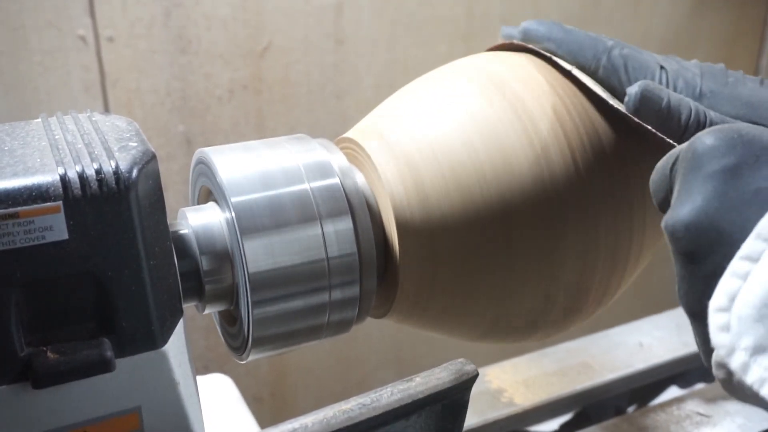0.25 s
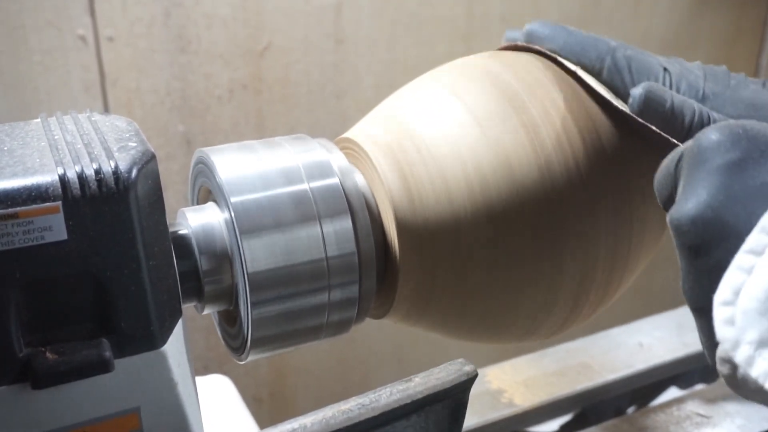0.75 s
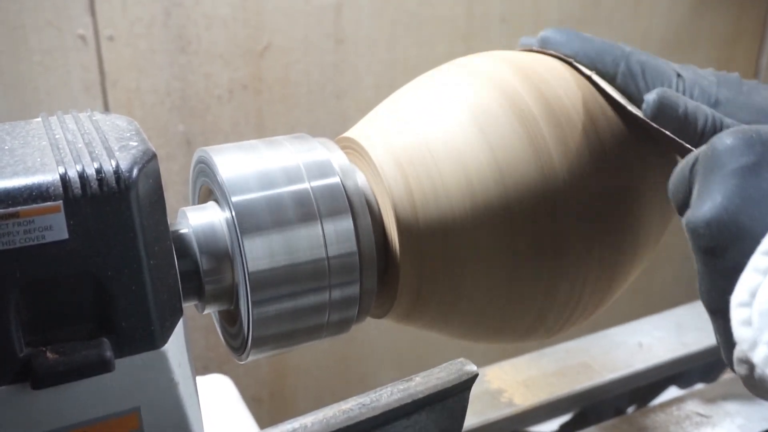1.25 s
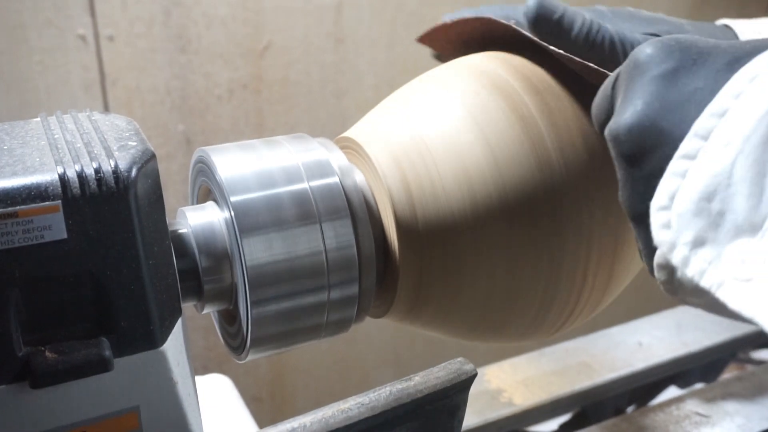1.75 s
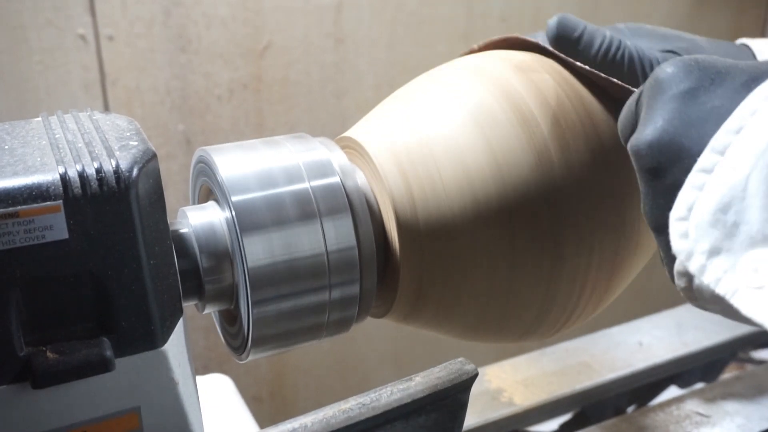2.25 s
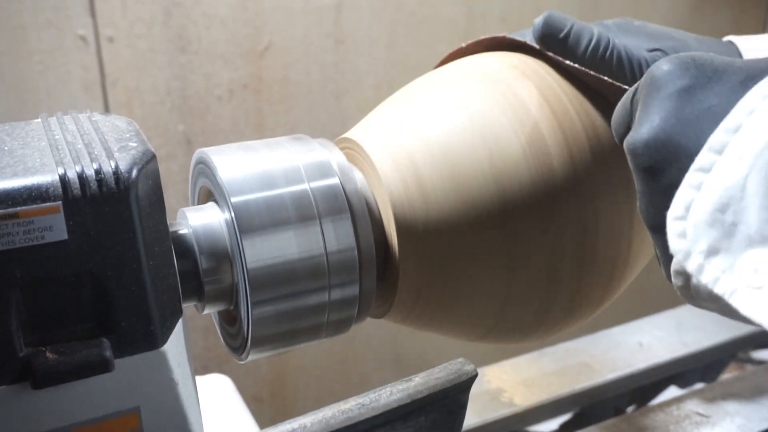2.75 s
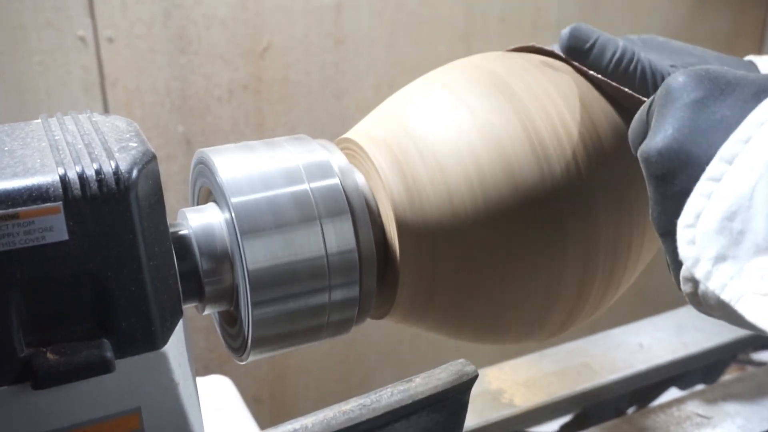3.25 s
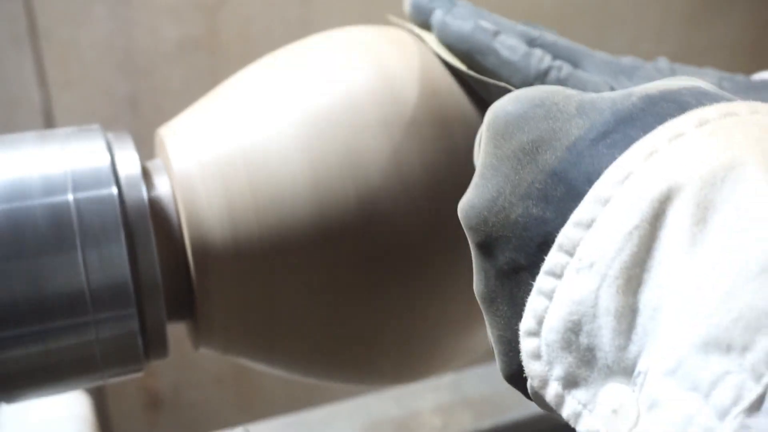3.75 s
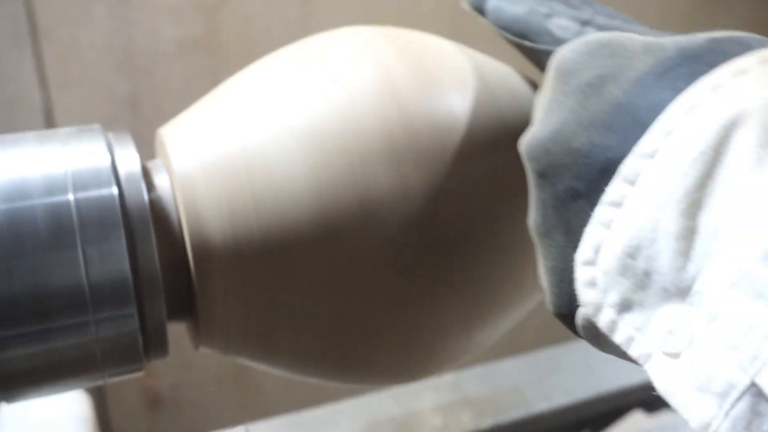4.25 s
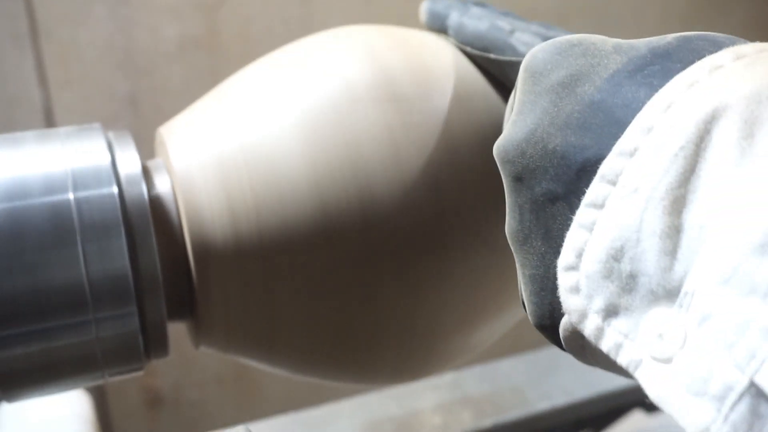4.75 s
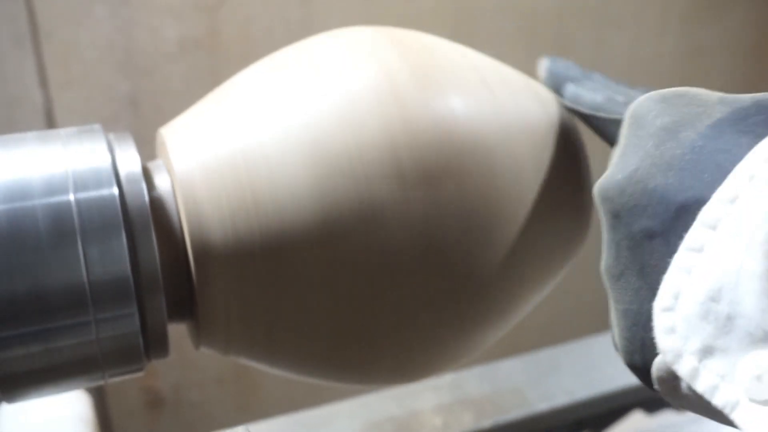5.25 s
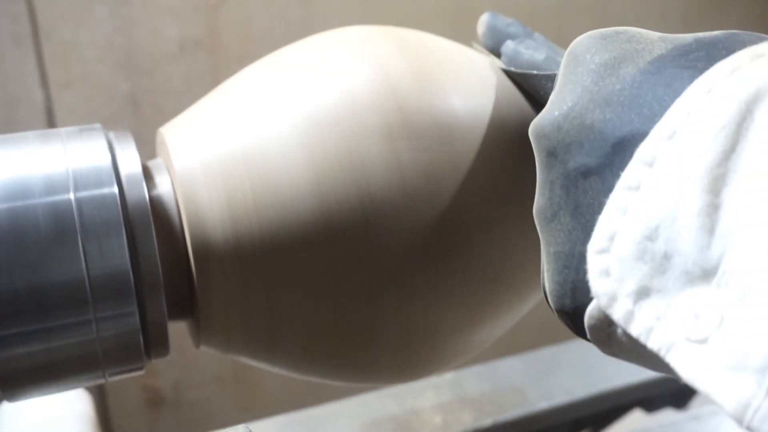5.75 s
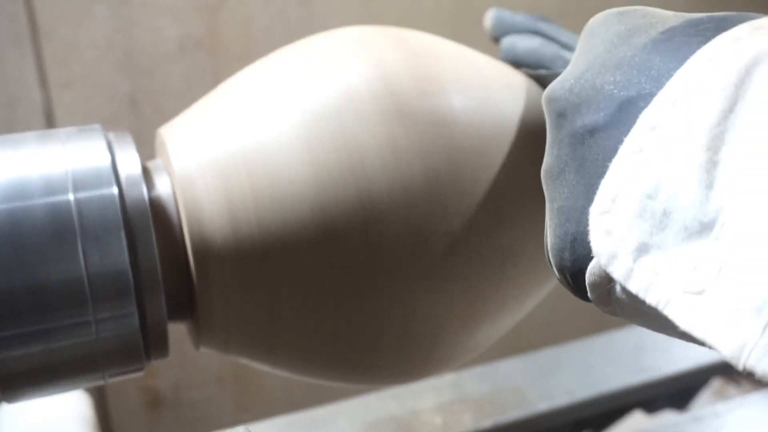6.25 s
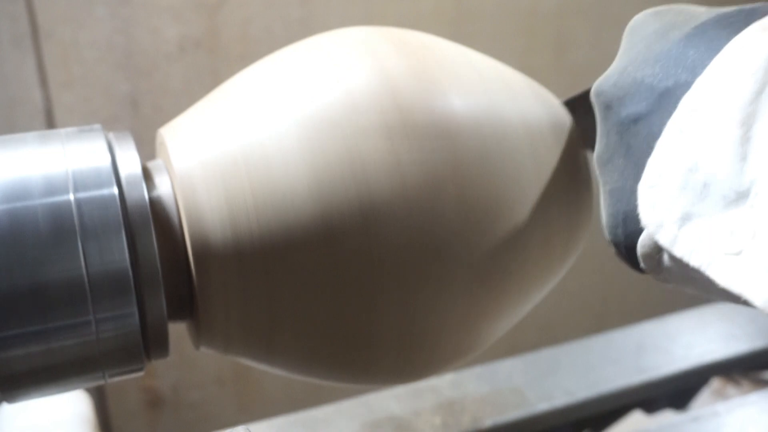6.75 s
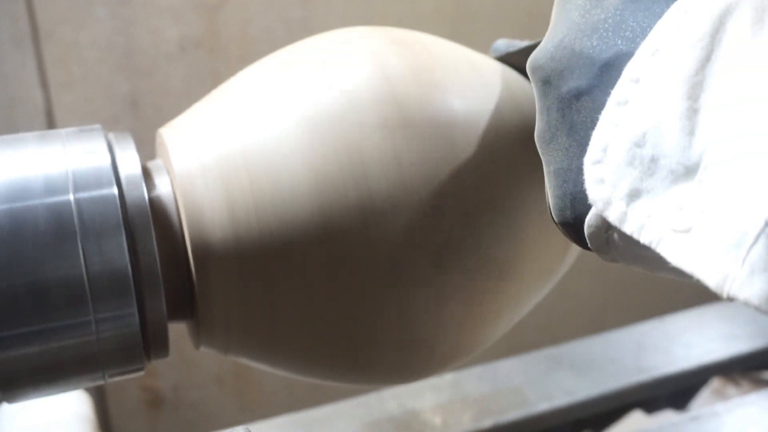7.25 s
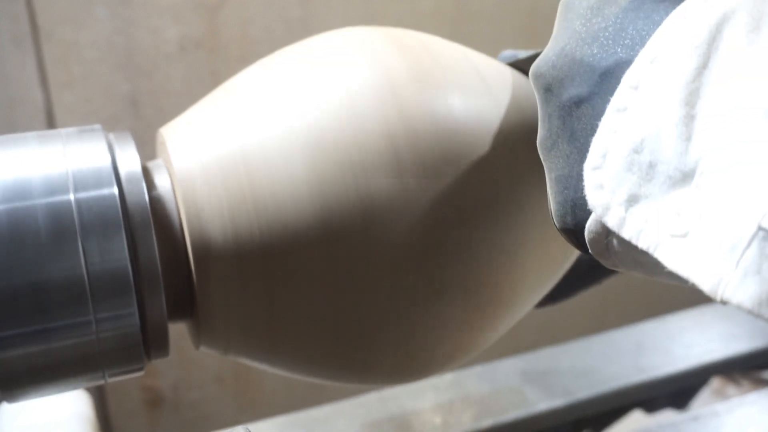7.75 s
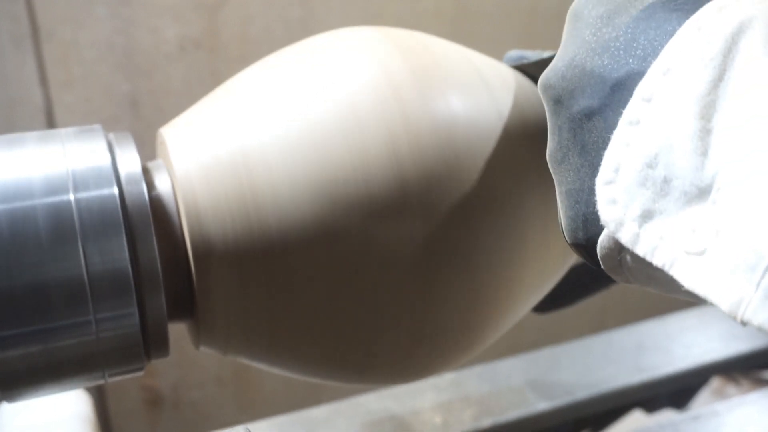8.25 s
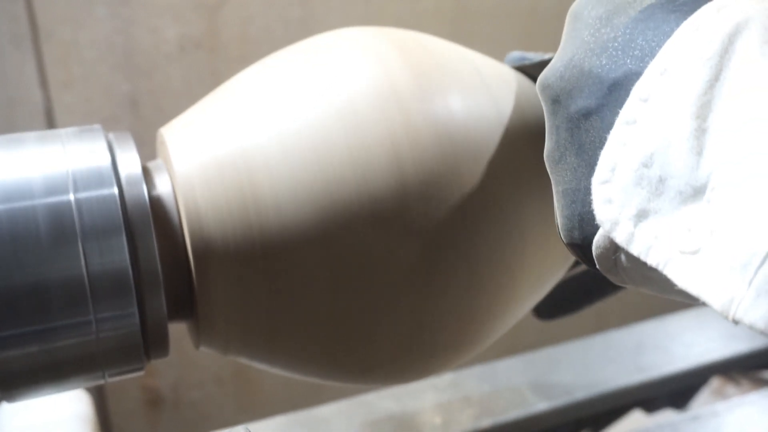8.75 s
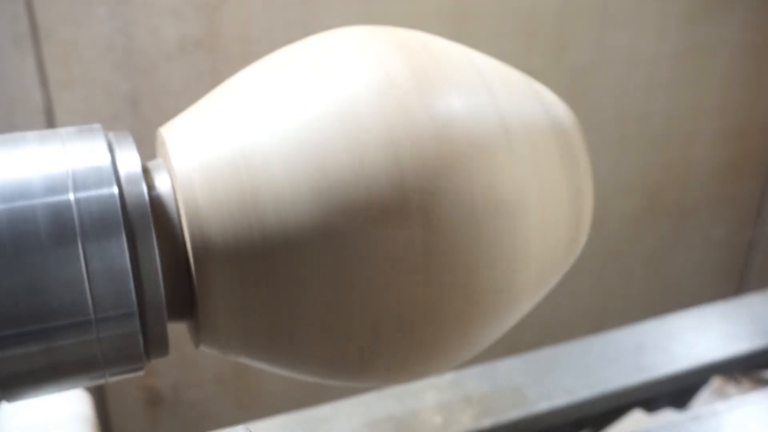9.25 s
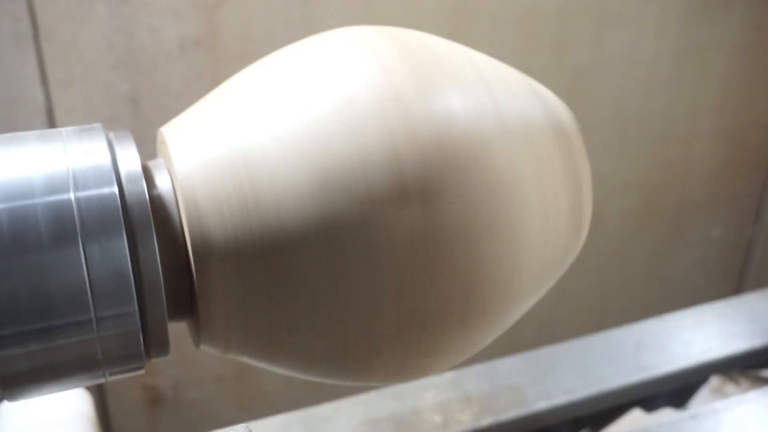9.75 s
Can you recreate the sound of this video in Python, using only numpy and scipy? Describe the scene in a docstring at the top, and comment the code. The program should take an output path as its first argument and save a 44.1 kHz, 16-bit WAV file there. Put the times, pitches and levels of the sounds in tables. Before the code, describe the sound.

Coarse sandpaper hisses brightly and unevenly against a wooden bowl spinning on a lathe, slightly to the right, over a faint throbbing rumble in a small workshop. It lifts at about 1.5 seconds, lands again with a rasp at 1.8 and carries on. At 3.5 seconds the sound jumps close to the machine: a low hum, rushing air, thin whines and rapid ticking. Finer paper now makes a softer, fizzier hiss, with short gaps near 4.2, 5.4, 6.2 and 7 seconds. From about 6.3 seconds a high spot slaps the paper on every turn, a fast rattle with a hollow wooden ring, and the paper flicks sharply at 6.8. The rattle strengthens through the last stroke, from 7.2 to 9 seconds. Then the paper lifts and the lathe runs on, still growing louder, with a brief scrape at 9.6 and a faint thin squeal just before 10.

```python
"""You hear sandpaper hissing on a wooden bowl that spins on a lathe in a small workshop.
First comes coarse paper, from further off. Then, close by, fine paper scratches over the hum and
ticking of the headstock, the housing that holds the spinning shaft (the spindle). The hiss is
grit scraping the wood. In the later strokes a high spot on the bowl slaps the paper once a turn
and makes the hollow wood ring."""
import sys
import numpy as np
from scipy import signal
from scipy.fft import rfft, irfft, next_fast_len
from scipy.io import wavfile
from scipy.ndimage import uniform_filter1d

SR = 44100
rng = np.random.default_rng(int(sys.argv[2]) if len(sys.argv) > 2 else 0)


def output_pcm(signal):
    """Save a mono or channel-first signal as 16-bit PCM at the path in sys.argv[1].

    Samples are clipped to [-1, 1] before scaling.
    """
    pcm = np.clip(np.atleast_2d(signal).T, -1, 1) * 32767
    wavfile.write(sys.argv[1], SR, np.round(pcm).astype(np.int16))


N = 440559
TIME, FFT_SIZE = np.arange(N) / SR, next_fast_len(N)
TURNS_PER_S = 28
CLOSE_S = 3.465  # from here on we listen close to the headstock
HIGH_SPOT = 0.34  # where the high spot comes round, as a share of one turn

# The workshop's echo. Each row: pitch in Hz, ring time (seconds to fade by 60 dB).
ROOM_RING = [(500, 0.98), (4000, 0.34), (15000, 0.24)]
# How alike left and right sound. Each row: pitch in Hz, likeness (1 means the same).
LIKENESS = [(100, .999), (250, 1), (500, 1), (1000, 1), (2000, 0.72), (5000, 0.41), (15000, 0.31)]
# How far the left wave runs ahead of the right. Each row: pitch in Hz, lead in radians.
LEFT_LEAD = [(30, .08), (60, 0.21), (125, 0.33), (250, 0.62), (520, 1), (1000, 1.15), (3000, 1.17),
             (8000, 0.13), (16000, -1.2)]

# Pressing slows the spindle and lifting the paper frees it.
# Each row: time in seconds, turns ahead of a steady spin.
SPINDLE_LEAD = [(0, .98), (3.6, .075), (4.25, -.135), (4.72, .035), (5.0, .005), (5.45, -.19),
                (5.62, -.168), (5.95, -.045), (6.6, -.039), (7.0, -.125), (7.4, -.101), (7.7, -.15),
                (8.1, -.275), (8.6, -.346), (9.15, -.38), (9.45, -.31), (9.75, -.249), (9.85, -.272),
                (9.99, -.401)]
# The distant lathe. Each row: time in seconds, rumble in dB, tone at twice the spin rate in dB.
FAR_LEVELS = [(0.0, -58, -72), (.3, -66, -78), (.78, -64, -59), (1.36, -65, -62), (1.5, -56, -53),
              (1.87, -53, -58), (1.98, -67, -77), (2.2, -58, -66), (2.65, -58.5, -58), (3.47, -61.5, -57)]
# The lathe's rushing air, far off and close by. Each row: pitch in Hz, relative level in dB.
FAR_AIR = [(18, -28), (30, -15), (60, -6.5), (110, -10), (165, -7), (215, -21.5), (300, -15.5), (486, -19),
           (600, -21.5), (950, -23), (1220, -37), (2500, -43), (5000, -52), (9000, -54), (12000, -50),
           (16000, -62)]
NEAR_AIR = [(18, -28), (40, -15), (190, -10.5), (300, -9), (900, -6), (1250, -12.5), (1900, -18),
            (2700, -20.5), (3600, -23.5), (4600, -28.5), (5100, -26.5), (6200, -32.5), (9000, -32.5),
            (12000, -35.5), (16000, -39)]
# The close lathe. Each row: time in seconds, hum level in dB, then the tones at 4, 5 and 11 times
# the spin rate in dB against the hum.
NEAR_LEVELS = [(3.55, -41.5, -14, 0, -11.5), (4.0, -40, -12, -1, -17), (4.3, -35.5, -12, -10, -4),
               (4.75, -40.5, -10, -4.5, -4), (5.1, -40.5, -12, -5, -14), (5.65, -39, -9, -9, -4),
               (6.0, -40, -7, -4, -5.5), (6.25, -36, -9, -10, -4.5), (6.65, -35.5, -13, -22, -7),
               (7.1, -33, -14, -8, -8.5), (7.5, -31.5, -18, -13, -11), (7.8, -31.5, -18, -10, -6.5),
               (8.2, -30, -14, -6, -5), (8.6, -29.5, -13, -7.5, -7.5), (9.03, -30, -12, -9, -10.5),
               (9.25, -27, -12, -12, -6), (9.55, -26, -12, -6.5, -2.5), (9.9, -25, -13, -13, -11.5)]
# The close tone at twice the spin rate. Each row: time in seconds, dB against the hum.
SECOND_TONE = [(3.5, -5), (5.0, -7), (5.75, -6), (6.7, -6.5), (7.2, -8.5), (8.6, -11.5), (9.2, -8),
               (9.99, -5.5)]
# The hum's tones. Each row: multiple of the spin rate, dB against the hum.
# Multiples 2, 4, 5 and 11 take their levels from the two tables above instead.
HUM_TONES = [(1, -26), (2, 0), (3, -18), (4, -13), (5, 0), (6, -13), (7, -26.5), (8, -16), (9, -12.5),
             (10, -12), (11, -2), (12, -21.5), (13, -24), (14, -10.5), (15, -22), (16, -33), (17, -13),
             (18, -22), (19, -18.5), (21, -23), (22, -21), (25, -22.5), (27, -31), (29, -17.5), (30, -24.5),
             (31, -17)]
# Machine whines. Each row: pitch in Hz, width in Hz, relative level in dB, share of the spindle's
# speed changes that it follows.
WHINES = [(1695, 92, -25, 1), (2295, 190, -18, 1), (3070, 80, -30, 1), (7940, 490, -30, 0.2),
          (9060, 40, -33, 0.089), (10200, 12, -42, 0), (11200, 370, -31.5, 0.93)]
# Headstock knocks. Each row: place as a share of one turn, relative dB on the casing, on the cover.
KNOCKS = [(0, 11, 0.5), (0.388, 1.5, -9)]
# The long-ringing casing and short-ringing cover.
# Each row: pitch in Hz, relative level in dB, ring time in seconds.
CASING_MODES = [(1008, -1.5, 0.098), (1028.6, 2, 0.096), (1112, 1, 0.051), (1377.5, 0, 0.068),
                (1610, -2, 0.029), (2338, 2, 0.03)]
COVER_MODES = [(3024, 2.5, 0.041), (3320, 8, 0.013), (3500, 5, 0.0098), (3896, -1, 0.031),
               (4170, -6, 0.065)]
# A thin squeal. Each row: time in seconds, level in dB.
SQUEAL_LEVELS = [(9.7, -65), (9.82, -46), (9.9, -52), (9.99, -34)]

# The wood's murmur, one row per coarse stroke. Each row: dB as the paper lands, dB once settled.
MURMUR_LEVELS = [(-60, -63), (-33.5, -47.5)]
# The murmur's tone. Each row: pitch in Hz, relative level in dB.
MURMUR_TONE = [(600, -23), (1150, -9), (1700, -3.5), (2000, -1.5), (2300, 4.5), (2600, -5.5), (4000, -31)]
# The paper catches or flicks free. Each row: start in seconds, level in dB, scrape in dB against
# the bright puff, pitch of the scrape in Hz.
FLICKS = [(5.689, -45, 9, 2600), (5.973, -45, 10, 3200), (6.477, -44, 11, 2800), (6.733, -34.5, 12, 4730),
          (6.781, -26, 8.5, 4640), (9.038, -37, 16, 2800), (9.632, -30.5, 14.5, 2050)]
# The high spot under the paper, one list per spell of slapping. Each row: time in seconds, ring of
# the bowl in dB, slap in dB, tilt towards the slap's upper tones in dB.
SLAPS = [
    [(4.4, -57, -70, 0), (5.35, -60, -57, 2)],
    [(5.61, -64, -54, 2), (5.97, -49, -53, 0), (6.15, -58, -49, -4)],
    [(6.29, -40, -48, -4), (6.46, -47, -43, 2), (6.63, -38.5, -42.5, 4), (6.8, -36, -34, 1)],
    [(7.17, -43, -37.5, 2), (7.34, -37.5, -36.5, 2), (7.46, -35, -33.5, -2.5), (7.63, -33, -38.5, -3),
     (7.85, -36, -38, -0.5), (8.0, -33, -33, -0.5), (8.19, -26, -34, -5), (8.35, -30.5, -37, -2),
     (8.5, -35.5, -33, -3), (8.66, -30, -32, -4.5), (8.78, -34, -36.5, -3), (8.92, -28.5, -31, -0.5),
     (9.01, -30, -29, 1)],
]
# The hollow bowl and the paper's backing.
# Each row: pitch in Hz, relative level in dB, ring time in seconds.
BOWL_MODES = [(770, 10, 0.055), (862, 0.5, 0.087)]
BACKING_MODES = [(1617, -2, 0.024), (1900, 10, 0.0083), (2133, 4.5, 0.021), (2614, 6.5, 0.013),
                 (3070, 8, 0.0075), (3440, 0, 0.0046), (4020, 0.5, 0.0053)]

# The hand's strokes. Each row: start, end, landing time and lifting time in seconds, fizz (13-15.5 kHz)
# in dB against the hiss, left minus right in dB at the start and at the end.
STROKES = [(0.0, 1.476, 0.042, 0.029, -2.5, -8.8, -7.5), (1.756, 3.46, .03, .003, -3, -4.5, -7),
           (3.458, 4.159, .003, 0.06, 8, -3, -6.3), (4.395, 5.34, .004, .05, 9, -6, -6),
           (5.604, 6.138, 0.04, 0.079, 7, -5.5, -5.6), (6.281, 6.77, 0.046, .02, 4.5, -5, -7),
           (7.161, 9.059, .04, .04, 3.5, -3, -5)]
# The hand rocks on the paper, one list per stroke. Each row: time in seconds, hiss (8-10.5 kHz) in dB,
# rasp (2.5-5 kHz) in dB against the hiss.
STROKE_LEVELS = [
    [(.07, -24, -16.5), (.24, -24.5, -9), (.5, -28, -10), (.79, -26, -8.5), (.89, -27, -12),
     (1.05, -29.5, -9), (1.14, -25, -9.5), (1.42, -30, -11)],
    [(1.8, -36, -3), (1.86, -33, 6), (1.885, -28, 0), (1.97, -25, -8.5), (2.26, -27, -12),
     (2.365, -24.5, -7), (2.63, -26.5, -12.5), (2.76, -25, -10), (3.05, -27, -8.5), (3.14, -24, -12),
     (3.3, -26.5, -9.5), (3.42, -25.5, -8)],
    [(3.5, -33.5, -15.5), (3.84, -34.5, -12), (3.95, -33.5, -16), (4.1, -36.5, -12)],
    [(4.42, -38.5, -12), (4.52, -35, -23), (4.65, -38, -18.5), (4.84, -36, -14.5), (4.95, -41, -14),
     (5.12, -37.5, -17), (5.28, -41, -14)],
    [(5.67, -41, -12), (5.78, -37.5, -11), (5.9, -36, -17), (5.98, -37.5, -6), (6.07, -40, -8)],
    [(6.33, -42.5, 2.5), (6.46, -36.5, -3), (6.62, -37.5, -3.5), (6.73, -35, 2)],
    [(7.22, -39.5, -1), (7.38, -38, 0), (7.5, -34.5, -4), (7.64, -37, -3), (7.75, -35, -1.5),
     (8.55, -33.5, -2.5), (8.63, -35, -1), (8.88, -33.5, -3.5), (9.0, -36, 2.5)],
]
# What rocking does to coarse, then fine paper.
# Each row: dB of fizz, dB of shift to the left, both for each extra dB of hiss.
ROCKING_EFFECT = [(-.5, 0.25), (-.2, 0.4)]
# The grit's tone. Each row: pitch in Hz, relative level in dB, share of the rasp, share of the fizz.
GRIT_TONE = [(500, -30, 0.73, 0.59), (1220, -24, 0.99, 1.1), (2340, -7.5, 1, 1.16), (2950, -2, 0.93, 0.14),
             (3880, -4.5, 0.61, 0.0095), (5820, -4, 0.34, 0), (8600, 0, 0.16, 0), (11600, 0, 0.072, 0.55),
             (14000, -0.5, 0, 1.05), (15500, -1.5, 0.22, 1.35)]
# The coarse paper's stiff backing colours its hiss. Each row: pitch in Hz, width in Hz, boost in dB.
COARSE_PEAKS = [(1640, 360, 6), (2260, 110, 0), (3560, 300, 2.5), (4220, 270, 3.5)]


def amp(db):
    """Turn decibels into a gain."""
    return 10 ** (np.asarray(db) / 20)


def unit_level(x):
    """Scale a signal to an average (rms) level of 1."""
    return x / np.sqrt(np.mean(x ** 2) + 1e-20)


def at_pitch(table, hz):
    """Read a table's columns at the given pitches, on a log scale."""
    pitches, *columns = np.transpose(table)
    return np.squeeze([np.interp(np.log(hz + 1), np.log(pitches + 1), c) for c in columns])


def at_time(tables, t):
    """Read the columns at times t; also give a gate that is 1 while any of the tables runs."""
    times, *columns = np.vstack(tables).T
    gate = sum((t >= rows[0][0]) * (t < rows[-1][0]) for rows in tables)
    return [np.interp(t, times, c) for c in columns], uniform_filter1d(np.minimum(gate, 1.), size=60)


def noise(tone):
    """Noise of level 1, shaped by rows of pitch in Hz and level in dB."""
    gain = amp(at_pitch(tone, np.fft.rfftfreq(FFT_SIZE, 1 / SR)))
    return unit_level(irfft(rfft(rng.standard_normal(FFT_SIZE)) * gain, FFT_SIZE)[:N])


def wander(rate_hz):
    """A random drift of size about 1 that wobbles up to roughly the given rate."""
    return 1.22 * np.interp(TIME * 2 * rate_hz, np.arange(20000), rng.standard_normal(20000))


def ring(strikes, modes, rise_s):
    """A struck object rings at its own tones (modes), which build up briefly and die away."""
    t = np.arange(6000) / SR
    tones = sum(amp(db - 60 * t / ring_s) * np.sin(2 * np.pi * hz * t) for hz, db, ring_s in modes)
    return unit_level(signal.oaconvolve(strikes, tones * (1 - np.exp(-t / rise_s)))[:N])


def turns():
    """Count the spindle's turns at each moment."""
    lead = np.interp(TIME, *np.transpose(SPINDLE_LEAD))
    return TURNS_PER_S * TIME + uniform_filter1d(lead, size=4000, mode="nearest")


def blows(place, fade_s, spread_db, rough):
    """One blow of uneven strength each turn: a click with a short tail of noise."""
    spin = turns() - place
    since_s = spin % 1 / TURNS_PER_S
    strength = amp(spread_db * rng.standard_normal(400))[spin.astype(int)]
    click = np.diff(since_s, prepend=0) < 0
    return strength * (click + rough * rng.standard_normal(N) * np.exp(-since_s / fade_s))


def stereo(first, second):
    """Make left and right: alike but slightly out of step in the bass, less alike in the treble."""
    hz = np.fft.rfftfreq(FFT_SIZE, 1 / SR)
    same = np.clip(at_pitch(LIKENESS, hz), 0, 1)
    shift = np.exp(.5j * at_pitch(LEFT_LEAD, hz))
    left = rfft(first, FFT_SIZE)
    right = same * left + np.sqrt(1 - same ** 2) * rfft(second, FFT_SIZE)
    return irfft([left * shift, right / shift], FFT_SIZE)[:, :N]


def room_echo(x):
    """The workshop answers with a tail of noise on each side; its treble dies first."""
    hz, t, bands = signal.stft(rng.standard_normal((2, SR // 2)), SR, nperseg=256)
    fade = amp(-60 * t / at_pitch(ROOM_RING, hz)[:, None])
    tail = signal.istft(bands * fade, SR, nperseg=256)[1]
    return signal.fftconvolve(x, tail / np.linalg.norm(tail[0]), axes=1)[:, :N]


def whines():
    """Bearings, belt and motor make narrow bands of noise; most follow the spindle's speed."""
    ahead_s, out = turns() / TURNS_PER_S - TIME, np.zeros(N)
    for hz, width, db, share in WHINES:
        angle = 2 * np.pi * hz * (TIME + share * ahead_s)
        out += amp(db) * (wander(width / 2) * np.cos(angle) + wander(width / 2) * np.sin(angle))
    return out


def lathe_far(whine, throbs_per_s=5.04, throb_db=5):
    """From further off the lathe is a throbbing bass, one low tone and a dull rush with whines."""
    (rumble_db, tone_db), _ = at_time([FAR_LEVELS], TIME)
    far, spin = TIME < CLOSE_S, turns()
    air = noise(FAR_AIR)
    low = signal.sosfiltfilt(signal.butter(3, 225, fs=SR, output="sos"), air)
    slow_throb = amp(throb_db * np.cos(2 * np.pi * throbs_per_s * (TIME - 0.076)))
    turn_throb = 1 + 0.36 * np.cos(2 * np.pi * (spin - 0.35))
    bass_db = -56.5 + 0.6 * (rumble_db - rumble_db[far].mean())
    bass = amp(bass_db) * slow_throb * turn_throb * low
    tone = np.sqrt(2) * amp(tone_db) * np.cos(2 * np.pi * 2 * spin)
    rush = amp(rumble_db + 9) * (air - low + amp(1) * uniform_filter1d(whine, size=4))
    return (bass + tone + rush) * far


def lathe_near(whine):
    """Close by, two knocks a turn ring the casing and cover, over rushing air and whines."""
    (hum_db, *_), _ = at_time([NEAR_LEVELS], TIME)
    places, casing_db, cover_db = np.transpose(KNOCKS)
    knocks = np.array([blows(place, fade_s=.002, spread_db=.7, rough=.025) for place in places])
    casing = ring(amp(casing_db) @ knocks, CASING_MODES, rise_s=0.0055)
    cover = amp(-12) * ring(amp(cover_db) @ knocks, COVER_MODES, rise_s=0.00042)
    air = amp(-5) * noise(NEAR_AIR)
    return amp(hum_db) * (amp(-6.5) * (casing + cover) + air + whine) * (TIME >= CLOSE_S)


def hum():
    """The close lathe hums at whole multiples of its spin rate, each swelling and sinking."""
    (hum_db, db4, db5, db11), _ = at_time([NEAR_LEVELS], TIME)
    swells = {2: np.interp(TIME, *np.transpose(SECOND_TONE)), 4: db4, 5: db5, 11: db11}
    spin, out = turns(), np.zeros(N)
    for multiple, db in HUM_TONES:
        level_db = swells.get(multiple, db + 1.7 * wander(2.4))
        out += np.sqrt(2) * amp(level_db) * np.cos(2 * np.pi * (multiple * spin + rng.random()))
    return amp(hum_db) * out * (TIME >= CLOSE_S)


def squeal(hz=2880):
    """One thin, wavering tone as the spindle slows at the end."""
    (db,), gate = at_time([SQUEAL_LEVELS], TIME)
    return amp(db + 2.7 * wander(30)) * gate * np.cos(2 * np.pi * (hz * TIME + .1 * wander(25)))


def hand(t):
    """The hand lands, rocks and lifts. Gives hiss, rasp, fizz, pan and rocking in dB, and contact."""
    hiss, rasp, fizz, pan, rock, touch = np.zeros((6, len(t)))
    for (start, end, land_s, lift_s, fizz_db, *pan_ends), curve in zip(STROKES, STROKE_LEVELS):
        on = (t >= start) & (t < end)
        now = t[on]
        fizz_share, pan_share = ROCKING_EFFECT[int(start >= CLOSE_S)]
        (hiss_db, rasp_db), _ = at_time([curve], now)
        landing, lifting = np.clip([1 - (now - start) / land_s, 1 - (end - now) / lift_s], 0, 1)
        rock[on], touch[on] = hiss_db - hiss_db.mean(), 1
        # A light touch is quieter and duller.
        hiss[on] = hiss_db - 9 * landing - 12 * lifting ** 2
        rasp[on] = rasp_db + 9 * (landing + lifting)
        fizz[on] = fizz_db + fizz_share * rock[on]
        pan[on] = np.interp(now, [start, end], pan_ends) + pan_share * rock[on]
    return hiss, rasp, fizz, pan, rock, touch


def murmur(settle_s=0.14):
    """The wood makes a dull noise under the coarse paper, stronger as the paper lands."""
    *_, rock_db, _ = hand(TIME)
    level = np.zeros(N)
    for (start, end, *_), (land_db, settled_db) in zip(STROKES, MURMUR_LEVELS):
        landing = np.exp(-((TIME - start) / settle_s) ** 2)
        db = settled_db + (land_db - settled_db) * landing + 0.45 * rock_db * (3 - landing)
        level += (TIME >= start) * (TIME < end) * amp(db)
    return uniform_filter1d(level, size=60) * noise(MURMUR_TONE)


def flicks(rise_s=0.0019, fade_s=0.0061):
    """The paper catches or flicks free: a double puff of bright noise with a lower scrape."""
    out = np.zeros(N)
    bright = noise([(3000, -32), (6000, -8), (12500, 10), (16000, -9)])
    for start, db, scrape_db, hz in FLICKS:
        scrape = noise([(hz * .095, -25), (hz * .75, -5), (hz, 0), (hz * 1.27, -7), (hz * 3.3, -25)])
        for delay_s, gain in [(0, 0.97), (.008, 0.37)]:
            age = np.maximum(TIME - start - delay_s, 0)
            puff = gain * np.minimum(age / rise_s, 1) * np.exp(-age / fade_s)
            out += amp(db) * puff * (bright + amp(scrape_db) * scrape)
    return out


def slaps():
    """Once a turn the high spot slaps the paper's backing and rings the hollow bowl."""
    (bowl_db, slap_db, tilt_db), gate = at_time(SLAPS, TIME)
    knock = blows(HIGH_SPOT + 0.019, fade_s=0.003, spread_db=2.2, rough=0.026)
    bowl = np.zeros(N)
    for hz, db, ring_s in BOWL_MODES:
        # The hand moves, so each tone is struck now harder, now softer.
        strikes = knock * amp(0.97 * wander(3.3))
        bowl += amp(db) * ring(strikes, [(hz, db, ring_s)], rise_s=0.001)
    blow = blows(HIGH_SPOT, fade_s=.007, spread_db=2, rough=.075)
    low = ring(blow, BACKING_MODES[:3], rise_s=.00025)
    high = ring(blow, BACKING_MODES[3:], rise_s=.00025)
    slap = amp(-1.5 - tilt_db / 2) * low + amp(-3 + tilt_db / 2) * high
    return gate * (amp(bowl_db) * unit_level(bowl) + amp(slap_db) * slap)


def sanding(press_db=7):
    """Grit scratches the wood as dense, uneven noise; the paper and the hand set its tone."""
    grains = rng.standard_normal((2, N)) * amp(wander(370) + 0.54 * wander(25))
    hz, t, bands = signal.stft(grains, SR, nperseg=256)
    _, rasp_db, fizz_db, *_ = hand(t)
    grit_db, rasp_share, fizz_share = at_pitch(GRIT_TONE, hz)[:, :, None]
    # Random patches of pitch and time make the tone flicker.
    patches = uniform_filter1d(rng.standard_normal(bands.shape[1:]), size=5, axis=0)
    flicker_db = 1.22 * unit_level(uniform_filter1d(patches, size=40, axis=1))
    peaks_db = sum(db / (1 + (2 * (hz[:, None] - f) / width) ** 2) for f, width, db in COARSE_PEAKS)
    tone_db = grit_db + peaks_db * (t < CLOSE_S) + rasp_share * rasp_db + fizz_share * fizz_db
    hiss = signal.istft(bands * amp(tone_db + flicker_db), SR, nperseg=256)[1][:, :N]
    hiss *= np.sqrt(SR / 2 / 2500) / grains.std()  # levels count per band 2500 Hz wide
    level_db, _, _, pan_db, _, touch = hand(TIME)
    level = uniform_filter1d(amp(level_db) * touch, size=60)
    # The high spot presses harder for a moment each turn.
    _, slapping = at_time(SLAPS, TIME)
    press = amp(press_db * slapping * np.exp(-((turns() - HIGH_SPOT) % 1) / 0.1))
    return stereo(*(hiss * press * level)) * amp([0.5 + pan_db / 2, 0.5 - pan_db / 2])


def scene():
    """Mix the paper, the wood, their echo and the lathe in stereo."""
    paper = sanding()
    wood_pair = [slaps() + flicks() + murmur() for _ in range(2)]
    wood = stereo(*wood_pair) * amp([[-.8], [1.8]])
    tones = hum() + squeal()
    lathe_pair = [lathe_far(whine) + lathe_near(whine) + tones for whine in (whines(), whines())]
    lathe = stereo(*lathe_pair) * amp([[.6], [.4]])
    return paper + wood + amp(-10.5) * room_echo(paper + wood) + lathe


def record(dry):
    """Cut the very highest treble, above 15900 Hz."""
    low_pass = signal.firwin(1023, 15900, window=("kaiser", 7), fs=SR)
    return signal.oaconvolve(dry, low_pass[None], "same")


dry = scene()
out = record(dry)
output_pcm(out)
```